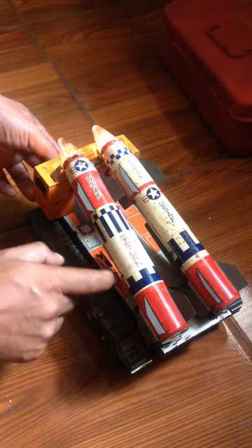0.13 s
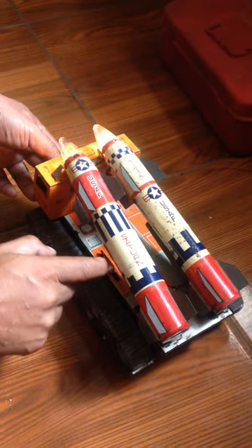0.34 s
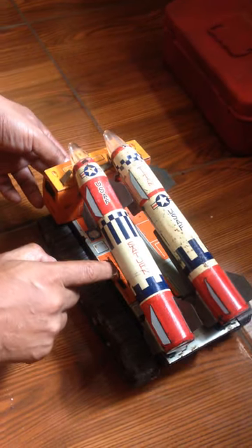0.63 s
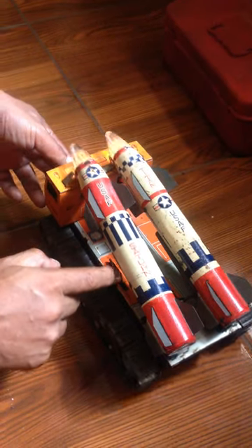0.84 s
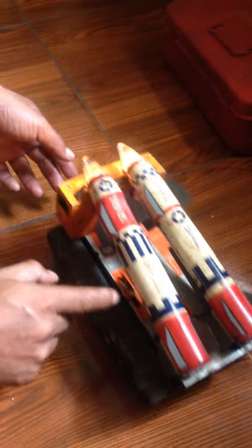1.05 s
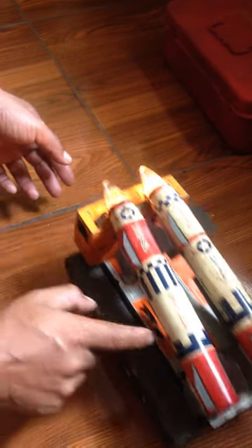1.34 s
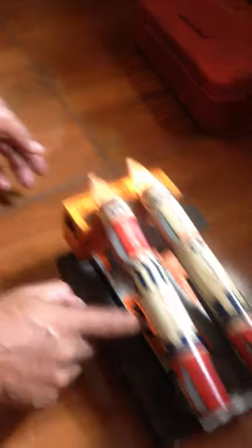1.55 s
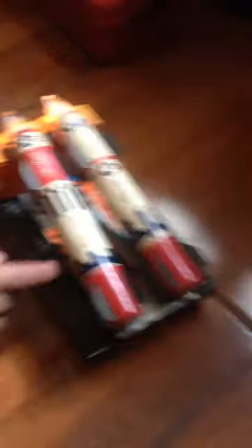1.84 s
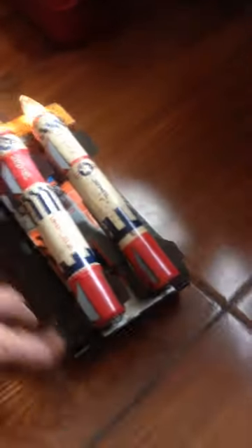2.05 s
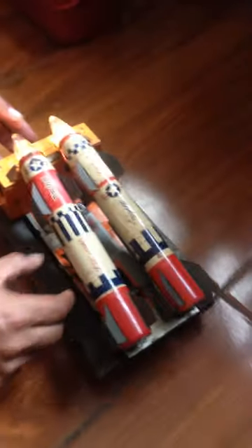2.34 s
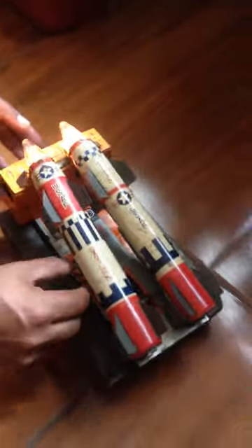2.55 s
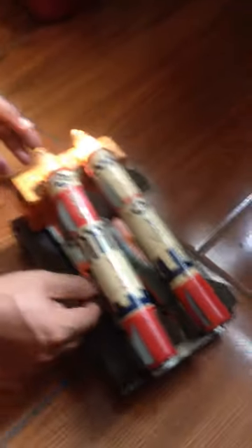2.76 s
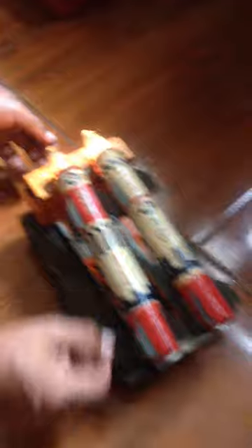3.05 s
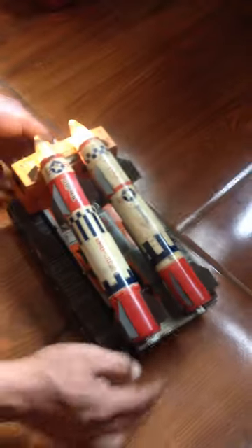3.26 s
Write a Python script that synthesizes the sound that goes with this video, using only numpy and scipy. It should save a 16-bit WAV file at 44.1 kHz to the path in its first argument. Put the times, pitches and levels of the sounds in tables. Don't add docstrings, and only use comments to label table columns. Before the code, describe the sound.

A small toy's gears idle faintly, clack and squeak into a bright rattling whir, nearly stop, then run again with clicks and scrapes, ending lighter; close phone microphone in a small hard room.

```python
import sys
import numpy as np
from scipy import signal
from scipy.io import wavfile
from scipy.ndimage import uniform_filter1d

SR = 44100
rng = np.random.default_rng(int(sys.argv[2]) if len(sys.argv) > 2 else 0)


def generate_wav(signal):
    frames = np.transpose(np.atleast_2d(signal))
    scaled = np.clip(frames, -1, 1) * 32767
    pcm = np.round(scaled).astype(np.int16)
    wavfile.write(sys.argv[1], SR, pcm)


def amplitude_ratio(level_db):
    exponent = np.asarray(level_db, float) / 20
    return 10 ** exponent


N = 149940


def evened(x):
    return x / np.sqrt(np.mean(x ** 2) + 1e-20)


def colour(x, points):
    f, db = np.transpose(points)
    hz = abs(np.fft.fftfreq(4096, 1 / SR))
    log_gain = np.interp(np.log(hz + 1), np.log(f + 1), db) * np.log(10) / 20
    taps = np.fft.ifft(np.exp(np.conj(signal.hilbert(log_gain)))).real[:2048]
    return signal.oaconvolve(x, taps)[:len(x)]


def ring(x, hz, width):
    r = np.exp(-np.pi * width / SR)
    poles = [1, -2 * r * np.cos(2 * np.pi * hz / SR), r * r]
    return np.sqrt((1 - r * r) / 2) * signal.lfilter([1, 0, -1], poles, x)


def drift(rate_hz):
    slow = rng.standard_normal(N // 64 + 2)
    slow = evened(signal.lfilter(*signal.butter(2, min(rate_hz * 128 / SR, .9)), slow))
    return np.interp(np.arange(N) / 64, np.arange(len(slow)), slow)


# time in seconds, gear level in dB, brightness in dB per octave,
# wheel load in dB.
DRIVE = [(0, -46.5, -1.5, -3.5), (0.099, -46, -1.5, -10), (.13, -43, -0.5, -6.5), (.345, -41.5, 0.3, -10),
         (.37, -37.5, 1.5, 3.5), (.62, -37, 0.95, -2), (.72, -41, -0.5, 1), (.83, -61.5, -4, -3),
         (0.891, -53, -2.5, -6), (0.963, -36.5, 0.7, -0.5), (1.2, -38, 1.26, 3), (1.5, -38.5, 1.5, 2.5),
         (1.68, -36.5, 1.5, 3), (1.85, -36.5, 1.07, -0.5), (2.4, -37.5, 1.36, -0.5),
         (2.7, -37.5, 0.9, -1.5), (2.8, -41, 1, -13), (3.4, -42.5, 1.35, -8)]


def control(column):
    rows = np.array(DRIVE)
    return np.interp(np.arange(N) / SR, rows[:, 0], rows[:, column])


def body(drive, modes):
    out = np.zeros(N)
    for f, width, db in modes:
        bent_hz = f * (1 + .012 * drift(5))
        turn = np.exp(2j * np.pi * np.cumsum(bent_hz) / SR)
        r = np.exp(-np.pi * width / SR)
        contact = drive * amplitude_ratio(3 * np.tanh(drift(20)))
        mode = turn * signal.lfilter([1], [1, -r], contact / turn)
        out += amplitude_ratio(db) * np.sqrt(1 - r * r) * mode.real
    return evened(out)


# frequency in Hz, density in dB per Hz.
MESH_SPECTRUM = [(150, -40.5), (550, -3), (1100, 2.5), (2600, 2.5), (7500, -6), (10300, -17), (12000, -17),
                 (15600, -4.5)]
# frequency in Hz, width in Hz, level in dB.
SHELL_MODES = [(517, 35, -15), (1440, 60, -9), (1700, 70, -7), (1790, 55, -6), (2060, 70, -8),
               (2400, 80, -4), (2600, 80, -5), (2770, 60, -6), (3010, 60, -7), (3220, 60, -8),
               (3730, 60, -7), (4470, 300, -2), (5300, 300, -5), (7000, 900, -2)]
# frequency in Hz, width in Hz, level in dB.
AXLE_MODES = [(1085, 35, 0.1), (1180, 100, -2), (1340, 120, -3), (760, 120, -3)]
# frequency in Hz, width in Hz, level in dB.
LOOSE_MODES = [(785, 30, -4), (430, 20, -7), (1810, 60, -7), (4700, 400, -5), (7330, 200, -8),
               (4050, 250, -6)]
SHELL_DB, AXLE_DB, LOOSE_DB = -3.5, -7, -17
TEETH_PER_S, TOOTH_SPREAD_DB, SMOOTH_SHARE = 2500, 2.4, .55
RATTLE_DB, RATTLE_HZ = 0.6, 37.6
GEAR_TURNS_PER_S, GEAR_BEAT = 62, 0.038


def gears():
    tooth_db = TOOTH_SPREAD_DB * np.minimum(rng.exponential(1, N), 5)
    knocks = (rng.random(N) < TEETH_PER_S / SR) * amplitude_ratio(tooth_db) * rng.choice([-1., 1.], N)
    drive = SMOOTH_SHARE * rng.standard_normal(N) + (1 - SMOOTH_SHARE) * evened(knocks)
    drive = drive * amplitude_ratio(RATTLE_DB * drift(RATTLE_HZ))
    turns = np.cumsum(GEAR_TURNS_PER_S * (1 + 0.163 * drift(4.2))) / SR
    drive = drive * (1 + GEAR_BEAT * np.sin(2 * np.pi * turns))
    load_db = control(column=3)
    whir = evened(colour(drive, MESH_SPECTRUM))
    whir = whir + amplitude_ratio(SHELL_DB) * body(drive, SHELL_MODES)
    whir = whir + amplitude_ratio(AXLE_DB + load_db) * body(drive, AXLE_MODES)
    whir = whir + amplitude_ratio(LOOSE_DB - load_db) * body(drive, LOOSE_MODES)
    hz, t, z = signal.stft(whir, SR, nperseg=256)
    octaves = np.log2(np.maximum(hz, 400) / 3000)[:, None]
    patches = uniform_filter1d(rng.standard_normal(z.T.shape), size=14, axis=0)
    patches = evened(uniform_filter1d(patches, size=3, axis=1)).T
    tilt = control(column=2)[np.minimum((t * SR).astype(int), N - 1)]
    z = z * amplitude_ratio(1.1 * patches + octaves * tilt)
    return amplitude_ratio(control(column=1)) * signal.istft(z, SR, nperseg=256)[1][:N]


# frequency in Hz, density in dB per Hz.
SNAP_SPECTRUM = [(300, -33.5), (1200, -5.5), (4500, 4.8), (7200, 2.5), (8500, -4.5), (11000, -9),
                 (12500, -4), (15600, 2.5)]
CHATTER_PER_S, CHATTER_DB, CHATTER_T60 = 140, -10.5, .014


def chatter():
    t = np.arange(1000) / SR
    hits = (rng.random(N) < CHATTER_PER_S / SR) * amplitude_ratio(5.4 * np.minimum(rng.exponential(1, N), 3))
    env = signal.oaconvolve(hits, amplitude_ratio(-60 * t / CHATTER_T60))[:N]
    grit = evened(colour(rng.standard_normal(N), SNAP_SPECTRUM))
    return amplitude_ratio(control(column=1) + CHATTER_DB) * env * grit


# start in seconds, level in dB.
THUMPS = [
    (0.226, -31),
    (0.251, -32.5),
    (0.281, -39.5),
    (2.702, -47),
    (2.771, -45),
]
# frequency in Hz, width in Hz, level in dB.
BOARD_MODES = [(149, 20, -4.5), (182, 35, -6), (245, 50, -3), (299, 14, -2.5), (390, 25, -6), (517, 22, -1),
               (752, 20, -2), (470, 30, -8)]
RUMBLE_DB, RUMBLE_FOLLOW = -58, 0.16
THUMP_RISE_S, THUMP_T60 = 0.0014, 0.083


def floorboards():
    t = np.arange(N) / SR
    env = amplitude_ratio(RUMBLE_DB + RUMBLE_FOLLOW * (control(column=1) + 32.5) + 2.2 * np.tanh(drift(20)))
    for s, db in THUMPS:
        since = np.maximum(t - s, 0)
        env = env + amplitude_ratio(db - 60 * since / THUMP_T60) * np.minimum(since / THUMP_RISE_S, 1)
    force = env * rng.standard_normal(N)
    return sum(amplitude_ratio(db) * ring(force, f, width) for f, width, db in BOARD_MODES) / 2


ROOM_DB, ROOM_T60, ROOM_TOP_T60 = -12.5, 0.28, 0.1


def room(x):
    taps, t = np.zeros(SR // 2), np.arange(SR // 2) / SR
    at = np.arange(150, SR // 2 - 22, 22)
    taps[at + rng.integers(0, 22, len(at))] = rng.choice([-1., 1.], len(at))
    low = signal.lfilter(*signal.butter(2, 3500, fs=SR), taps)
    tail = low * amplitude_ratio(-60 * t / ROOM_T60) + (taps - low) * amplitude_ratio(-60 * t / ROOM_TOP_T60)
    return amplitude_ratio(ROOM_DB) * signal.fftconvolve(x, tail / np.linalg.norm(tail))[:N]


# frequency in Hz, density in dB per Hz.
AIR_SPECTRUM = [(100, 18), (300, 10), (700, 5), (1100, 7), (2000, 8.5), (4000, -12), (8000, -28),
                (15500, -28)]


def still_air():
    return amplitude_ratio(-60) * evened(colour(rng.standard_normal(N), AIR_SPECTRUM))


# start in seconds, level in dB, ring in Hz,
# second ring in Hz, T60 in seconds.
TAPS = [(.1022, -37, 2600, 2700, .07), (.778, -47, 5300, 3300, .04), (.838, -54, 2600, 4200, .03),
        (.882, -52, 7000, 4300, .03), (.8928, -50, 2070, 4400, .04), (.1255, -29, 1950, 2250, .05),
        (.8016, -49, 4300, 6500, .04), (.848, -54, 4300, 2900, .03), (.921, -44, 2070, 4400, .045),
        (.6255, -36, 12200, 5200, .09), (1.817, -35, 14600, 4900, .05), (3.045, -38, 1400, 1420, .06),
        (3.19, -39, 1820, 1800, .08)]
# start in seconds, level in dB,
# ring in Hz, second ring in Hz, T60 in seconds.
CLACKS = [(.143, -53, 1800, 4500, 0.054), (.338, -40, 1780, 2680, 0.05), (.381, -32, 1100, 4430, 0.082),
          (0.47, -37, 5000, 7100, 0.12), (0.619, -38, 5070, 2400, 0.042), (0.6918, -32, 8060, 7000, 0.07),
          (0.9457, -37, 2600, 4360, .05), (.9707, -35, 5550, 7000, 0.089),
          (0.9991, -27.5, 4130, 2330, 0.043), (1.058, -35, 7500, 5530, 0.044),
          (1.701, -38, 5500, 3550, 0.049), (1.756, -35, 6600, 4900, 0.054),
          (1.8077, -29.5, 6650, 5400, 0.12), (1.834, -31.5, 2680, 2630, 0.065),
          (2.0095, -37, 4170, 5260, 0.035), (2.341, -34, 8450, 5100, 0.1),
          (.761, -44, 5100, 4200, 0.071),
    (1.094, -32, 5200, 7150, .06),
    (1.69, -43, 6500, 5350, .05),
    (1.7782, -26, 3930, 940, 0.033),
    (2.038, -33.5, 2310, 6900, 0.081),
    (2.473, -37, 8400, 5670, 0.15),
          (.6318, -27, 5200, 7300, .035),
    (1.3638, -25.5, 7050, 4700, .05),
    (.858, -54, 13800, 8800, .04),
    (.1218, -33, 8200, 9300, .03),
]
CLACK_DB, RING_DB, RING_WIDTH_HZ, CLACK_RISE_S = -3, 4, 450, .0003
CRACK_DB, CRACK_S, TAP_SNAP_DB = 3, .002, -16


def clacks():
    out, t = np.zeros(N), np.arange(6000) / SR
    hard = CLACKS
    for k, (s, db, hz, hz2, t60) in enumerate(hard + TAPS):
        puff = rng.standard_normal(6000)
        rings = ring(puff, hz, RING_WIDTH_HZ) + ring(puff, hz2, RING_WIDTH_HZ)
        snap = evened(colour(puff, SNAP_SPECTRUM)) * (1 + amplitude_ratio(CRACK_DB) * np.exp(-t / CRACK_S))
        if k >= len(hard):
            snap = snap * amplitude_ratio(TAP_SNAP_DB)
        env = amplitude_ratio(db + CLACK_DB - 60 * t / t60) * np.minimum(t / CLACK_RISE_S, 1)
        out[round(s * SR):][:6000] += (snap + amplitude_ratio(RING_DB) * evened(rings)) * env
    return out


# start in seconds, level in dB, frequency in Hz, T60 in seconds.
PINGS = [(.1252, -24, 1920, .05), (.1218, -26, 4550, .03), (.1222, -27, 4000, .03), (.1245, -26, 1720, .05),
         (.128, -27, 2230, .06), (.8016, -41, 3120, .06), (.812, -47, 3100, .12), (.8472, -37, 1060, .035),
         (1.818, -32, 1100, .09), (2.745, -41, 790, .1), (2.77, -39, 765, .12), (2.89, -43, 785, .2),
         (2.89, -42, 7330, .5), (3.04, -46, 790, .12), (3.105, -44, 790, .25), (3.21, -47, 785, .1),
         (3.235, -45, 785, .1), (3.27, -46, 785, .1), (3.305, -44, 785, .12), (3.355, -41, 785, .15)]


def pings():
    out, t = np.zeros(N), np.arange(N) / SR
    waver = np.cumsum(1 + 0.00955 * drift(62)) / SR
    for s, db, hz, t60 in PINGS:
        env = amplitude_ratio(db - 60 * np.maximum(t - s, 0) / t60)
        env = env * np.clip((t - s) * hz / 2, 0, 1)
        out += env * np.sin(2 * np.pi * hz * waver)
    return out


# time in seconds, frequency in Hz, level in dB.
SQUEAK = [
    (.122, 4250, -55),
    (.13, 4300, -37),
    (.15, 4350, -36),
    (.165, 4950, -39),
    (.2, 4750, -44),
    (.34, 4600, -48),
    (.42, 4550, -60),
]
SQUEAK_WIDTH_HZ = 160


def squeak():
    s, hz, db = np.transpose(SQUEAK)
    t, r = np.arange(N) / SR, np.exp(-np.pi * SQUEAK_WIDTH_HZ / SR)
    fuzz = signal.lfilter([1], [1, -r], rng.standard_normal(N) + 1j * rng.standard_normal(N))
    tone = (fuzz * np.exp(2j * np.pi * np.cumsum(np.interp(t, s, hz)) / SR)).real
    return amplitude_ratio(np.interp(t, s, db, -120, -120)) * evened(tone)


# start in seconds, peak level in dB, frequency in Hz.
TICKS = [(.6183, -21, 5200), (.6331, -12, 5200), (.635, -16, 7300), (.6388, -17, 4000), (.6416, -16, 3500),
         (.646, -19, 7100), (.9964, -21, 5000), (1.236, -20, 4500), (1.2745, -21, 5000),
         (1.4531, -22, 4430), (1.6546, -21, 5550), (1.692, -16, 5300), (1.7012, -10, 5000),
         (1.7025, -10, 6500), (1.7581, -21, 3730), (1.782, -15, 3900), (1.785, -18, 6600),
         (1.796, -19, 3000), (2.0085, -15, 4200), (2.4713, -17, 8600)]
TICK_T60, TICK_EDGE_DB, TICK_DB = .0045, -9, -3


def ticks():
    out, t = np.zeros(N), np.arange(1000) / SR
    for s, db, hz in TICKS:
        edge = evened(colour(rng.standard_normal(1000), SNAP_SPECTRUM))
        strike = np.sin(2 * np.pi * hz * t) + amplitude_ratio(TICK_EDGE_DB) * edge
        out[round(s * SR):][:1000] += amplitude_ratio(db + TICK_DB - 60 * t / TICK_T60) * strike
    return out


# peak in seconds, level in dB, rise in seconds, fall in seconds.
SCRAPES = [
    (0.632, -23, 0.01, 0.042),
    (1.096, -32, 0.026, 0.019),
    (1.697, -25.5, 0.042, 0.032),
    (1.779, -26, 0.01, 0.039),
    (1.82, -43, 0.012, 0.034),
    (2.011, -33, 0.043, 0.012),
    (2.481, -31, 0.016, 0.037),
    (2.621, -41, 0.022, 0.066),
    (3.271, -33.5, 0.022, 0.035),
]


def scrapes():
    t = np.arange(N) / SR
    env = np.zeros(N)
    for s, db, rise, fall in SCRAPES:
        env += amplitude_ratio(db) * np.exp(np.where(t < s, (t - s) / rise, (s - t) / fall))
    grit = rng.standard_normal(N) * amplitude_ratio(1.6 * np.tanh(drift(170)))
    return env * evened(colour(grit, SNAP_SPECTRUM))


def scene():
    toy = gears() + chatter() + floorboards() + clacks() + pings() + squeak() + ticks() + scrapes()
    return np.tile(toy + room(toy) + still_air(), (2, 1))


def low_pass(x):
    return signal.sosfilt(signal.butter(12, 15690, fs=SR, output="sos"), x)


def record(dry):
    bass_cut = signal.butter(4, 135, "high", fs=SR, output="sos")
    heard = signal.sosfilt(bass_cut, dry) + amplitude_ratio(-75) * rng.standard_normal(N)
    top_limit = signal.firwin(901, 15290, window=("kaiser", 8), fs=SR)
    return low_pass(signal.oaconvolve(heard, top_limit[None], "same"))


dry = scene()
out = record(dry)
generate_wav(out)
```